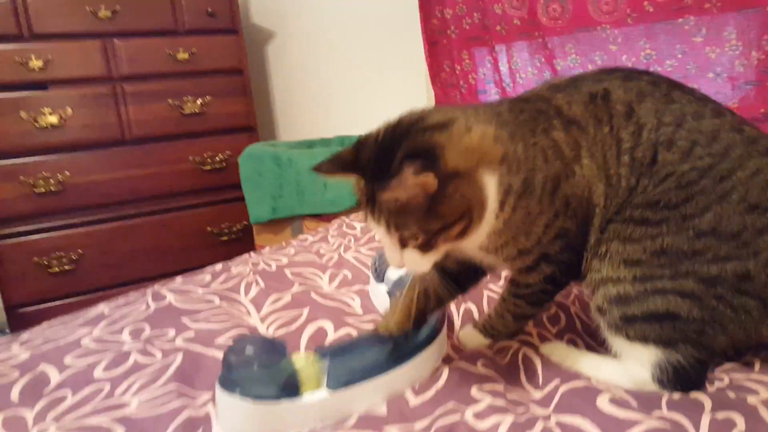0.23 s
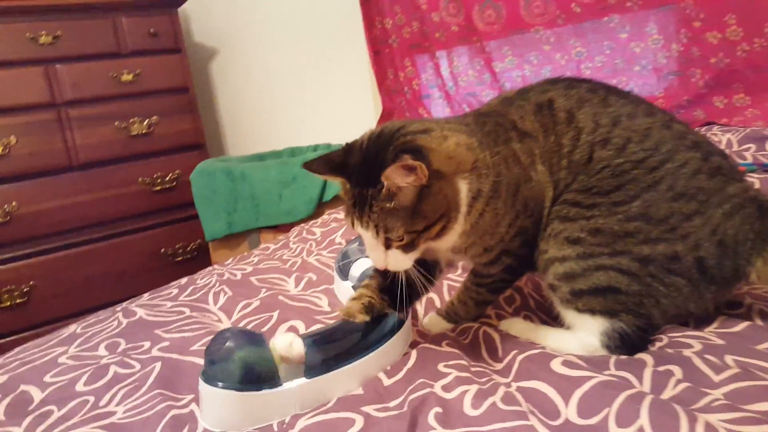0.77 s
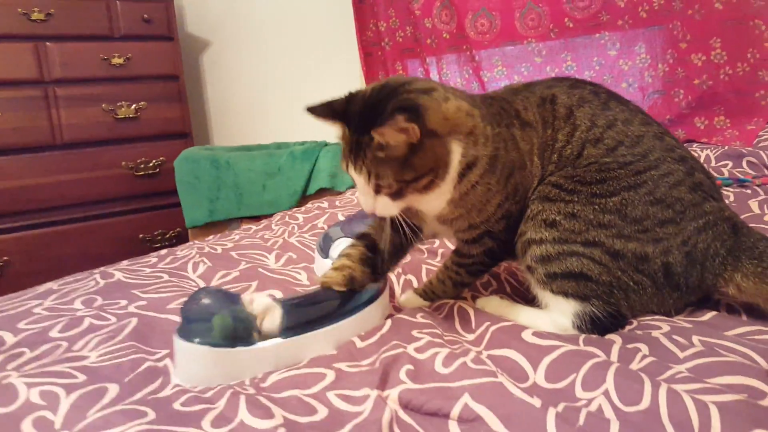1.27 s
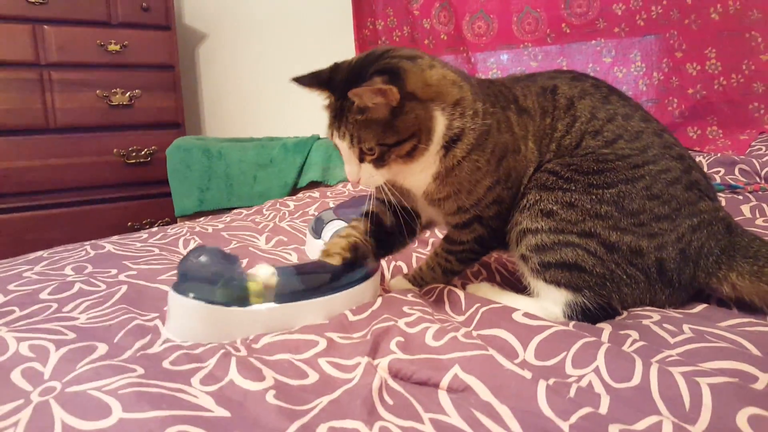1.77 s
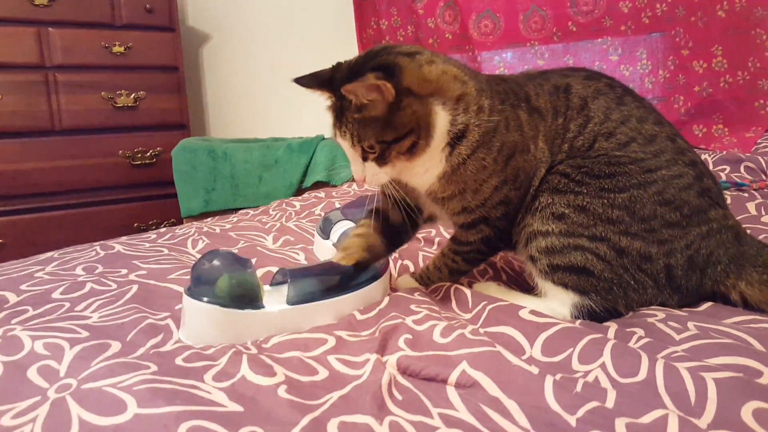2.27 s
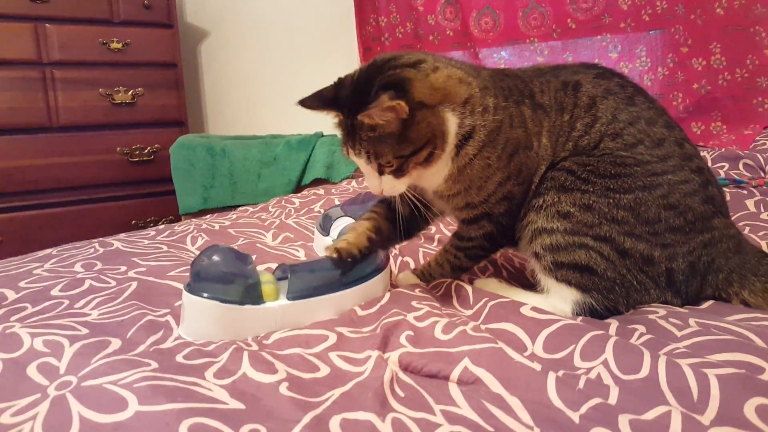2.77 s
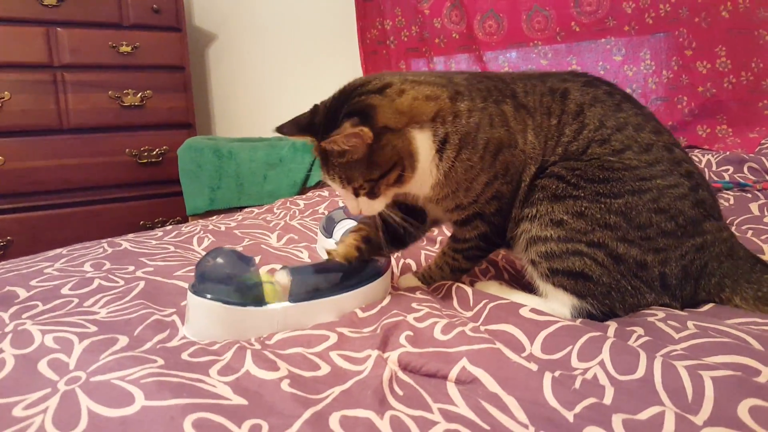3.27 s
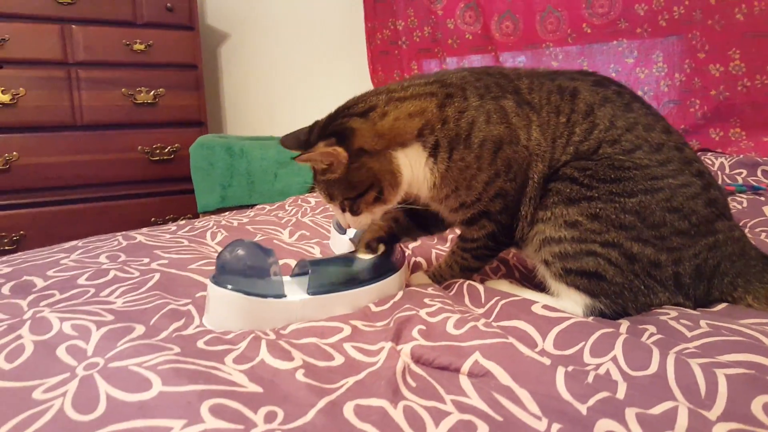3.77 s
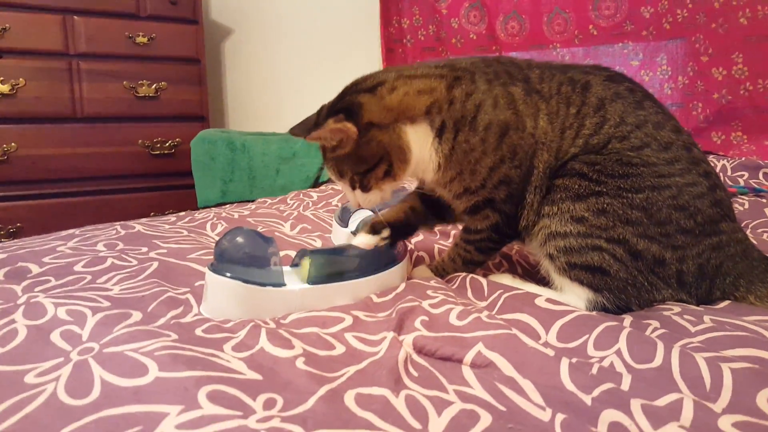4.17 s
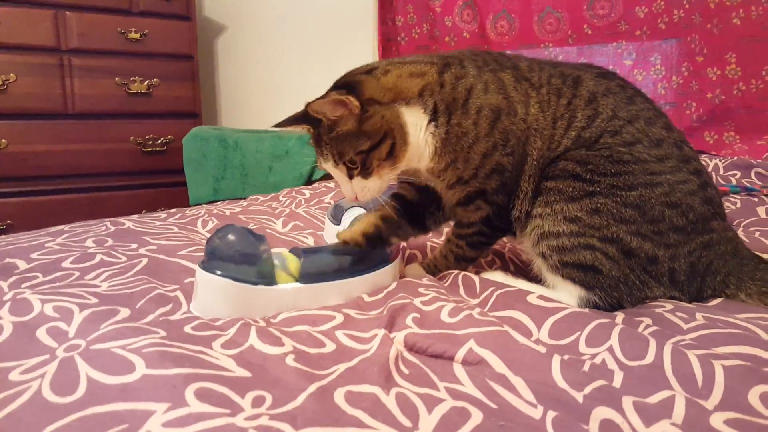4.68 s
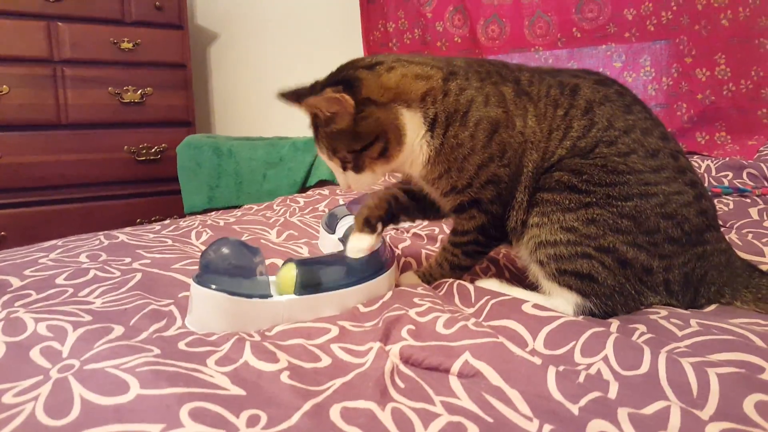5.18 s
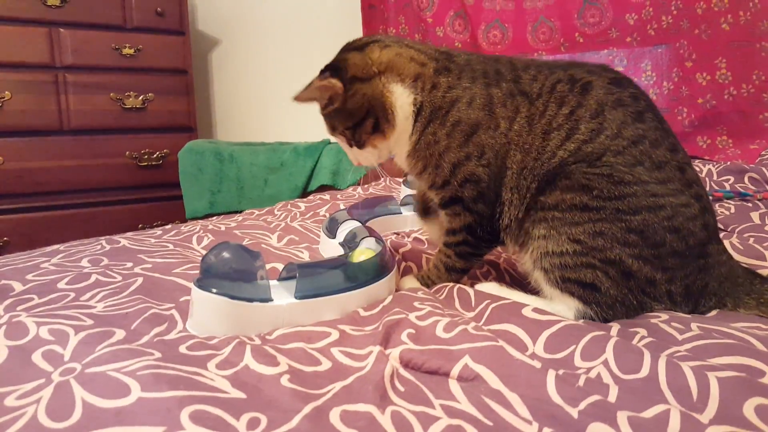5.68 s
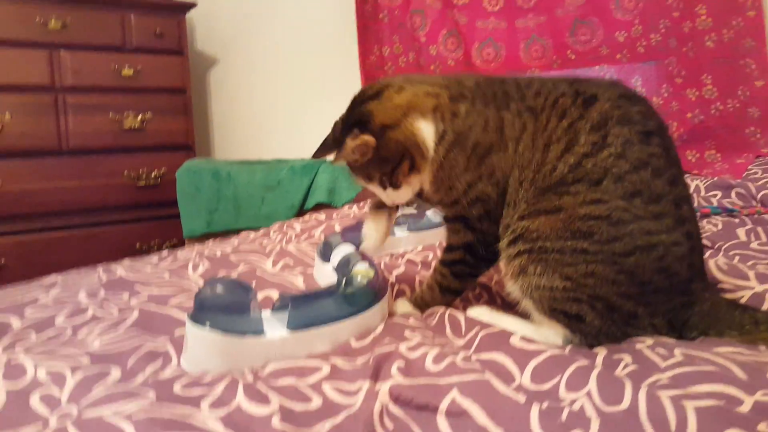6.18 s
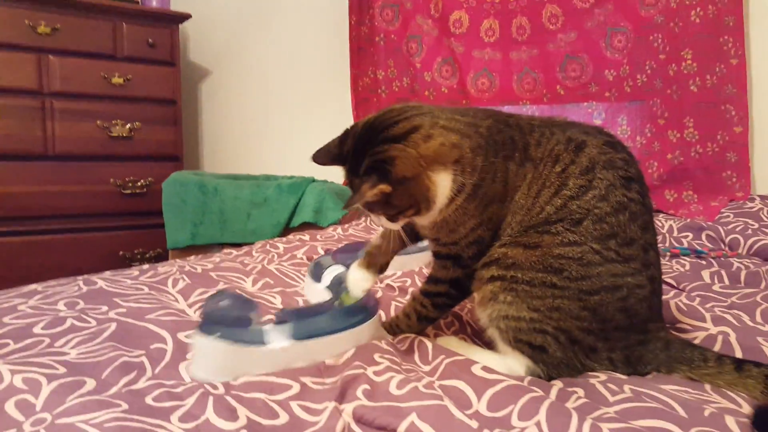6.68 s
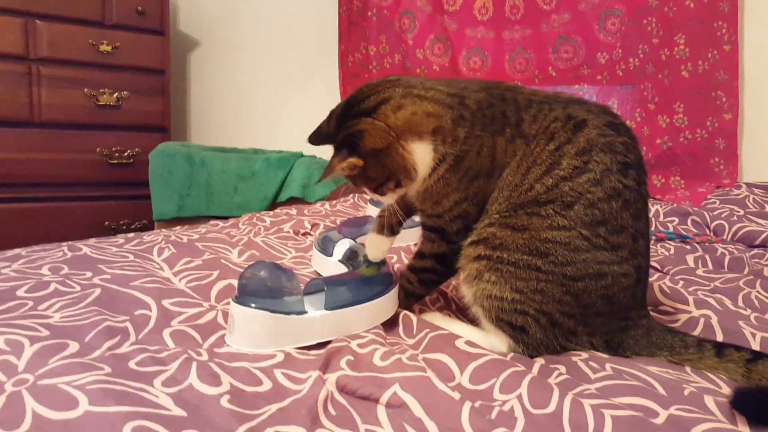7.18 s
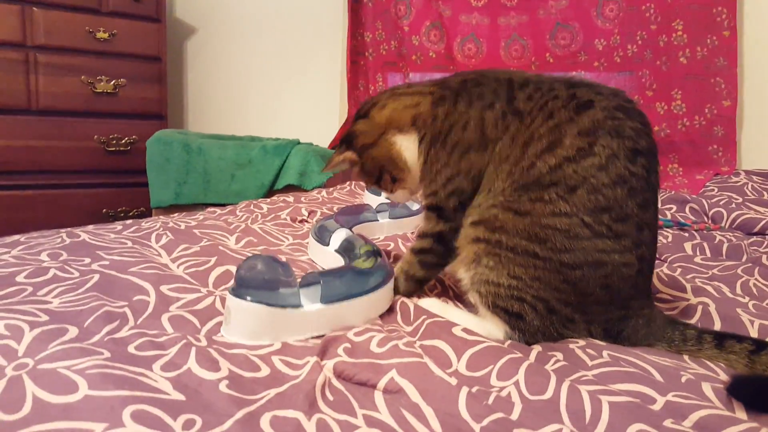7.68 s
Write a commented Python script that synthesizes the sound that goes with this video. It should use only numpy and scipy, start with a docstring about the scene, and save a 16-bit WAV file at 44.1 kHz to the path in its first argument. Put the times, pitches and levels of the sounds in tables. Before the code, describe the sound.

Light plastic clicks and brief rolling rattles come from a ball in a track toy as a cat paws it in a quiet bedroom.

```python
"""A hollow ball knocks, rattles and rolls in a plastic track toy as a cat bats it about on a bed.
Each knock is a short ring of the ball's shell, a thud of the hollow track and a hard plastic click.
The rolling, the paws brushing the quilt and the claws scraping the cover are swells of tiny contacts
and friction noise. A small bedroom answers them and hums with ventilation, and a touch pops the left
microphone port once."""
import sys
import numpy as np
from scipy import signal
from scipy.fft import rfft, irfft, next_fast_len
from scipy.io import wavfile

SR = 44100
rng = np.random.default_rng(int(sys.argv[2]) if len(sys.argv) > 2 else 0)


def master_out(mix):
    """Clip the mix to full scale and print it as 16-bit PCM to the path in sys.argv[1]."""
    frames = np.transpose(np.atleast_2d(mix))
    ceiling = np.clip(frames, -1, 1)
    pcm = np.round(ceiling * 32767).astype(np.int16)
    wavfile.write(sys.argv[1], SR, pcm)


N = 350154


def amp(db):
    """Decibels to gain."""
    return 10 ** (np.asarray(db) / 20)


def unit(x):
    """Scale to rms 1."""
    return x / np.sqrt(np.mean(x ** 2) + 1e-20)


def unit_hit(x):
    """Scale to the energy of one millisecond at rms 1."""
    return x / np.sqrt(np.sum(x ** 2) * 1000 / SR + 1e-20)


def along(points, hz):
    """Read (frequency, value) points on a log frequency axis."""
    freqs, values = np.transpose(points)
    return np.interp(np.log(hz + 1), np.log(freqs + 1), values)


def filtered(x, response):
    """EQ x with a complex response, given as a function of frequency."""
    n = x.shape[-1]
    padded = next_fast_len(n + 4096, True)
    return irfft(rfft(x, padded) * response(np.fft.rfftfreq(padded, 1 / SR)), padded)[..., :n]


def resonance(f, hz, width):
    """The band-pass response of one mode."""
    return 1j * f * width / (hz * hz - f * f + 1j * f * width)


def impulse(spectrum, size=2048):
    """The minimum-phase impulse response of an EQ curve."""
    cepstrum = irfft(np.log(amp(along(spectrum, np.fft.rfftfreq(size, 1 / SR)))))
    cepstrum[1:size // 2] *= 2
    cepstrum[size // 2 + 1:] = 0
    return irfft(np.exp(rfft(cepstrum)))


def add(bus, s, x):
    """Mix x into the bus at s seconds."""
    part = bus[..., max(0, round(s * SR)):][..., :x.shape[-1]]
    part += x[..., :part.shape[-1]]


def stereo(noises, correlation):
    """Mix two unrelated noises to left and right, with a width that depends on frequency."""
    angle = lambda hz: np.arccos(np.clip(along(correlation, hz), -.99, .99)) / 2
    mid, side = filtered(noises, lambda hz: np.array([np.cos(angle(hz)), np.sin(angle(hz))]))
    return np.array([mid + side, mid - side])


def swells(rows):
    """The summed envelope of strokes that fade smoothly in and out."""
    t = np.arange(N) / SR
    return sum(amp(db) * np.maximum(1 - (2 * (t - s) / length) ** 2, 0) ** 2 for s, length, db in rows)


def grains(spectrum, per_s, spread_db, friction):
    """Random tiny contacts over a layer of friction noise, rms 1."""
    ticks = (rng.random(N) < per_s / SR) * rng.choice([-1, 1], N)
    ticks = ticks * amp(spread_db * np.clip(rng.standard_normal(N), -2, 2))
    texture = unit(ticks) + friction * rng.standard_normal(N)
    return unit(signal.fftconvolve(texture, impulse(spectrum))[:N])


# Reverb decay of the bedroom: (frequency [Hz], t60 [s])
ROOM_DECAY = [(200, 0.55), (1800, 0.25), (8000, 0.28), (15000, 0.052)]
def bedroom(x, wet_db, pan_db=2.5, left_lead_ms=0.14, build_s=0.00026):
    """A source on the bed: the direct sound, louder on the right, then a short diffuse tail."""
    hz, t, noise = signal.stft(rng.standard_normal((2, SR // 2)), SR, nperseg=256)
    envelope = amp(-60 * t / along(ROOM_DECAY, hz)[:, None]) * (1 - np.exp(-t / build_s))
    tail = signal.istft(noise * envelope, SR, nperseg=256)[1]
    tail = stereo(tail, correlation=[(400, 1.0), (1200, 0.42), (2500, -0.3), (6000, -0.21)])
    wet = signal.fftconvolve(x[None], tail / np.linalg.norm(tail[0]), axes=1)[:, :len(x)]
    sides = np.array([[-1], [1]])
    delay_s = sides * left_lead_ms / 2000
    direct = filtered(x, lambda f: amp(sides * pan_db) * np.exp(-2j * np.pi * f * delay_s))
    return direct + amp(wet_db) * wet


# Tone of the moving air: (frequency [Hz], relative level [dB])
AIR_EQ = [(15, -14), (40, -7.5), (65, -13), (100, 2), (160, -3), (260, -5), (330, -10), (470, -8),
          (1000, -19), (2000, -24), (3500, -32.5), (6800, -38.5), (10500, -40.5), (15000, -39)]
# Two low room modes, a hump and a dip in the hiss: (frequency [Hz], width [Hz], gain [dB])
AIR_BELLS = [(230.3, 24, 4), (416.6, 19, 9), (7850, 770, 6.5), (10000, 3100, -5.5)]
# Fader ride of the air: (time [s], relative level [dB])
AIR_FADER = [(0.0, -51.5), (0.88, -53.5), (2.87, -52.5), (3.56, -57), (5.04, -54), (7.52, -54),
             (7.94, -53.5)]
# Stereo image of the air: (frequency [Hz], left-right correlation [-1 to 1])
AIR_IMAGE = [(60, 0.9), (130, 0.98), (290, 0.89), (640, 0.63), (1410, -0.27), (3100, 0.061), (6820, -0.095),
             (15000, -0.046)]
def ventilation(gain_db=1.1, left_db=0.7):
    """Steady low air noise hums in the room's modes, with a faint hiss on top."""
    bells = lambda f: sum(db / (1 + (2 * (f - hz) / width) ** 2) for hz, width, db in AIR_BELLS)
    noise = stereo(rng.standard_normal((2, N)), AIR_IMAGE)
    air = filtered(noise, lambda f: amp(along(AIR_EQ, f) + bells(f)))
    fader_db = np.interp(np.arange(N) / SR, *np.transpose(AIR_FADER))
    return unit(air) * amp(fader_db + gain_db + left_db * np.array([[1], [-1]]))


# Tone of the rubbed fabric: (frequency [Hz], relative level [dB])
QUILT_EQ = [(400, 3), (1500, -3), (2500, -0.5), (4000, -5), (6000, -11), (8000, -3.5), (8700, -11),
            (9800, -22.5), (13000, -14), (16000, -10)]
# Strokes across the quilt: (centre time [s], length [s], relative level [dB])
QUILT_STROKES = [(.02, 0.39, -59.5), (.45, 2.4, -68), (1.87, .17, -68), (2.53, 0.11, -67),
                 (3.28, 0.097, -65.5), (6.18, .12, -73), (6.7, 0.48, -62), (7.49, 0.087, -69),
                 (7.79, 0.27, -69)]
def quilt_brushes(gain_db=-2):
    """Paws and toy brush the quilt in soft swells of fine-grained rustle."""
    rustle = grains(QUILT_EQ, per_s=830, spread_db=9.0, friction=0.65)
    return bedroom(amp(gain_db) * swells(QUILT_STROKES) * rustle, wet_db=3)


# Tone of the rolling ball: (frequency [Hz], relative level [dB])
ROLL_EQ = [(210, -25), (350, -13), (511, -8), (932, -3), (1110, -29), (1410, -4), (1990, 6), (2190, -9),
           (2510, 1), (3170, -24), (3540, -43), (4090, -12), (5000, -54), (6500, -56), (11000, -120)]
# Runs along the track: (centre time [s], length [s], relative level [dB])
BALL_RUNS = [(0.057, 0.31, -51), (.385, 0.091, -55), (0.588, 0.094, -60), (1.753, 0.27, -58.5),
             (2.168, 0.28, -62), (2.615, 0.048, -49), (3.328, 0.055, -70), (5.039, .12, -57.5),
             (5.538, 0.22, -73), (6.559, 0.26, -68)]
def ball_rolls(gain_db=-3.5):
    """The ball trundles over the ribs of the track in short, grainy runs."""
    trundle = grains(ROLL_EQ, per_s=240, spread_db=4.5, friction=0.28)
    return bedroom(amp(gain_db) * swells(BALL_RUNS) * trundle, wet_db=-2.5)


def ball_rattles(per_s=16, level_db=-51, ring_hz=1720, hardness_db=-10, tilt=-2, send_db=-5):
    """The rolling ball taps the channel walls at random: faint extra hits for ball_knocks to play."""
    taps = []
    for centre, length, _ in BALL_RUNS:
        count = max(1, round(per_s * length))
        for k, (jitter, strength, pitch) in enumerate(rng.uniform(-1, 1, (count, 3))):
            s = centre + length * ((k + .5 + jitter / 2) / count - .5)
            taps.append((s, level_db + 0.5 * strength, ring_hz + 210 * pitch, hardness_db, tilt, send_db))
    return [tap for tap in taps if tap[0] > 0]


def contact(t, t60, chatter=0.33):
    """One push and a brief chatter of the surfaces: smeared in time, even in frequency."""
    spectrum = rfft((t == 0) + chatter * rng.standard_normal(len(t)) * amp(-60 * t / t60))
    return irfft(spectrum / (np.abs(spectrum) + 1e-9), len(t)) * (t < 2 * t60)


def shell_ring(t, hz, t60):
    """The shell's pitch depends on where it is hit; two neighbour modes and an overtone die faster."""
    ring = np.sin(2 * np.pi * hz * t) * amp(-60 * t / t60)
    for ratio, mode_db in [(.8, -9), (1.2, -6.5), (2.25, -17)]:
        mode_hz = hz * ratio * rng.normal(1, .025)
        ring -= amp(mode_db - 60 * t / (0.41 * t60)) * np.sin(2 * np.pi * mode_hz * t)
    return unit_hit(ring)


# Hollow body of the track: (frequency [Hz], width [Hz], relative level [dB])
TRACK_MODES = [(245, 170, -6.5), (494, 176, -4), (728, 60, 2.5), (822, 380, -4), (1137, 205, -0.5),
               (1400, 270, -0.5)]
def track_thud(t):
    """A contact knocks on the broad modes of the hollow track, which alternate in polarity."""
    hollow = lambda f: sum((-1) ** k * amp(db) * resonance(f, hz, width)
                           for k, (hz, width, db) in enumerate(TRACK_MODES))
    return unit_hit(filtered(contact(t, t60=0.0082), hollow))


# Tone of hard plastic contact: (frequency [Hz], relative level [dB])
CLICK_EQ = [(900, -14.5), (1600, 1.5), (2400, 5.5), (3300, 2), (4200, 1.5), (5000, -2), (5800, -6.5),
            (6800, -7), (7600, -3.5), (8600, -7.5), (9600, -31), (14000, -26)]
def plastic_click(t, tilt):
    """Plastic snaps on plastic; tilt brightens or dulls it, in dB per octave from 2 to 8 kHz."""
    tone = impulse([(hz, db + tilt * np.log2(np.clip(hz, 2000, 8000))) for hz, db in CLICK_EQ])
    return unit_hit(signal.fftconvolve(contact(t, t60=0.0072), tone)[:len(t)])


# The ball strikes the track; hardness is the click's gain within the hit:
# (time [s], level [dB], ring pitch [Hz], hardness [dB], click tilt [dB/octave], relative send [dB])
BALL_HITS = [(0.026, -34, 1770, -1, -15, -0.5), (0.0552, -32, 2030, -3.5, -3.5, -1),
             (0.061, -30.5, 1870, -17, -9, -7), (0.0668, -30, 1640, -11, -3, -7),
             (.109, -26.5, 1860, -13, -5, -9), (0.1163, -26, 1900, -10.5, 4, -10),
             (0.2447, -48.5, 1990, -3, 10, 4.5), (.3598, -42, 1490, -22, -2, 5),
             (0.3779, -33.5, 1920, -9, -3, 1.5), (0.3927, -32.5, 1720, -16.5, 10, -3),
             (0.5203, -42.5, 1720, -2.5, 8, 0), (0.5822, -42, 1970, -22, -3, -4),
             (0.6718, -42, 1710, -11, -4, -1), (0.726, -35, 1980, -12, -4, -6),
             (0.8182, -36.5, 2020, -4, -10.5, -7), (1.0257, -50, 1510, -18, -9, -2),
             (1.5679, -48.5, 1400, -1, -0.5, -5), (1.8789, -36.5, 1810, -15, -2, -5),
             (1.9044, -55, 1550, 2.5, 8, -5), (2.0342, -38.5, 2540, 0.5, -0.5, 1),
             (2.4838, -44.5, 1830, -24, -9, -11), (2.5688, -46, 1430, -18, 8, -3),
             (2.5895, -28, 1737, -4, 7, -3), (2.6402, -33, 1790, -29, 1, -5.5),
             (2.91, -45.5, 1400, -13, -3, -3), (3.051, -53, 1680, -1.5, 19, 0),
             (3.2407, -45.5, 1560, -11, -5, 0), (3.3101, -36, 1740, -15, -3, 6),
             (3.33, -30.5, 1730, -2.5, -1, -4.5), (3.3357, -28, 1970, -12, -8, -18),
             (3.4384, -49, 2530, 13.5, -2, 0), (3.5638, -44.5, 1720, -14, -4, -3.5),
             (3.6409, -39.5, 1760, 0.5, 2.5, 2.5), (4.1156, -40.5, 1730, -10, -11, -3),
             (4.1547, -46, 1400, -23, -6, -7), (4.2297, -49, 1950, 5.5, -8.5, 3.5),
             (4.337, -38, 2410, 5, -7.5, -2.5), (4.77, -38.5, 1870, -6, -7.5, 2.5),
             (4.806, -45.5, 1730, -8.5, 1.5, -4), (4.8113, -34, 1850, -18, -13, -6.5),
             (5.0017, -55, 1880, 14, 1.5, 0.5), (6.331, -39, 1520, -6, -4, 1),
             (6.5049, -43.5, 1400, -10, -1.5, -1), (6.5787, -45, 1520, -2, -6, 0),
             (6.9347, -42.5, 1520, -10, -2, -1), (7.0452, -40, 1940, -1.5, -3, -5),
             (7.388, -34.5, 1580, -4, -8.5, -4)]
def ball_knocks(typical_db=-40, typical_hardness_db=-10, typical_t60_s=0.012, wet_db=-3.0):
    """Each hit layers ring, thud and click. Strong hits ring longer; hard ones are shorter and thinner."""
    out, t = np.zeros((2, N)), np.arange(SR // 2) / SR
    lowpass = signal.butter(2, 4500, fs=SR)  # shell and track are too heavy to follow the top end
    for s, db, hz, hardness_db, tilt, send_db in BALL_HITS + ball_rattles():
        stronger, harder = db - typical_db, hardness_db - typical_hardness_db
        t60 = typical_t60_s * 2 ** (stronger / 30 - harder / 35)
        ring = amp(0.5) * shell_ring(t, hz, t60)
        thud = amp(-4.5 - 0.1746 * harder) * track_thud(t)
        click = amp(hardness_db) * plastic_click(t, tilt)
        knock = signal.lfilter(*lowpass, ring + thud) + click
        add(out, s, bedroom(amp(db) * knock, wet_db + send_db))
    return out


# Tone of the scraped plastic cover: (frequency [Hz], relative level [dB])
COVER_EQ = [(600, -10), (1300, -10), (1850, 4), (2450, -0.5), (3000, -11), (3700, -20), (4700, -15),
            (5600, -20), (6600, -19.5), (7400, -12), (8200, -18), (9400, -31), (16000, -29)]
# Swipes at the cover: (centre time [s], length [s], level [dB], scratch pitch [Hz])
CLAW_SWIPES = [(.94, 0.069, -57.5, 4660), (1.13, 0.051, -55.5, 2240), (1.4, 0.071, -57, 4470),
               (1.687, 0.073, -52.5, 4700), (1.731, 0.041, -56, 2420), (2.02, 0.094, -50.5, 2500),
               (2.14, .043, -59, 4140), (4.668, .14, -65, 2400), (6.594, 0.052, -57.5, 4000)]
def claw_scrapes(scratch_db=-7, width_hz=1000):
    """Claws skid on the cover with a gritty rasp; each swipe adds a scratch at its own pitch."""
    out = np.zeros(N)
    grit = grains(COVER_EQ, per_s=600, spread_db=8.5, friction=0.58)
    for s, length, db, hz in CLAW_SWIPES:
        n = round(length * SR)
        rasp = grit[round(s * SR):][:n]
        scratch = unit(filtered(rng.standard_normal(n), lambda f: resonance(f, hz, width_hz) ** 2))
        add(out, s - length / 2, amp(db) * np.hanning(n) * (rasp + amp(scratch_db) * scratch))
    return bedroom(out, wet_db=-2.5)


def port_pop(at_s=3.01912, gain_db=1.5, rise_s=.00012, hold_s=0.00372, release_s=0.0028, cut_hz=122):
    """A touch on the left port briefly saturates the capsule; its bass cut makes the pulse swing back."""
    out, t = np.zeros((2, N)), np.arange(SR // 8) / SR
    pressure = np.minimum(t / rise_s, 1) * np.exp(-np.maximum(t - hold_s, 0) / release_s)
    pop = signal.lfilter(*signal.butter(2, cut_hz, "high", fs=SR), pressure)
    add(out[0], at_s, amp(gain_db) * pop)
    return out


def scene():
    """The mix: ball, cat, room tone and one pop."""
    return ball_knocks() + ball_rolls() + quilt_brushes() + claw_scrapes() + ventilation() + port_pop()


def record(dry, top_hz=15900):
    """A brick-wall high cut on the whole mix."""
    return filtered(dry, lambda hz: hz < top_hz)


dry = scene()
out = record(dry)
master_out(out)
```